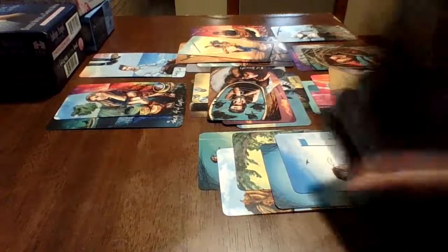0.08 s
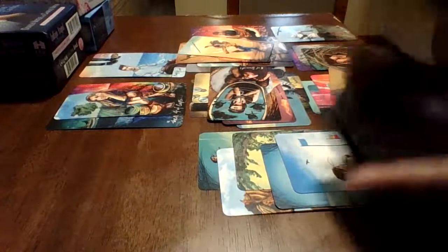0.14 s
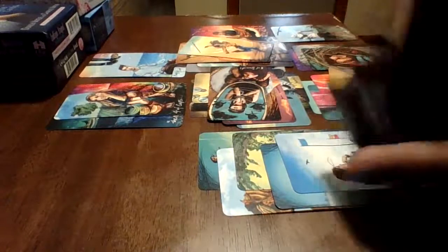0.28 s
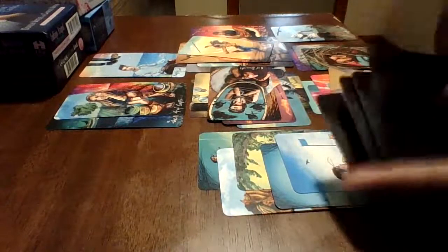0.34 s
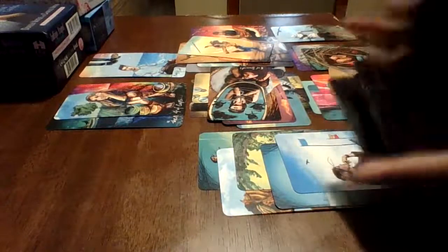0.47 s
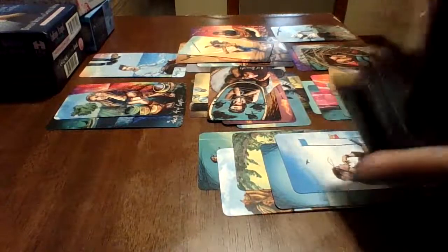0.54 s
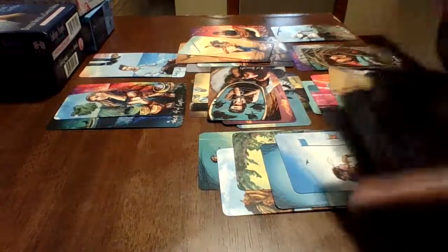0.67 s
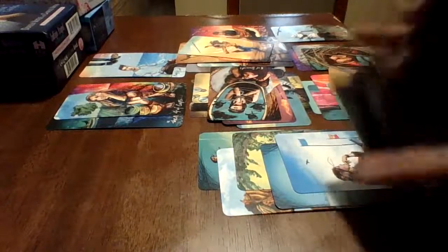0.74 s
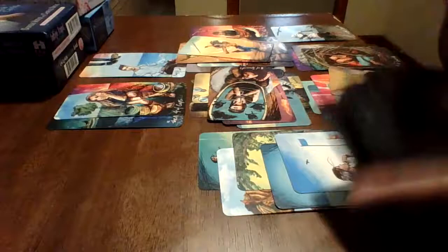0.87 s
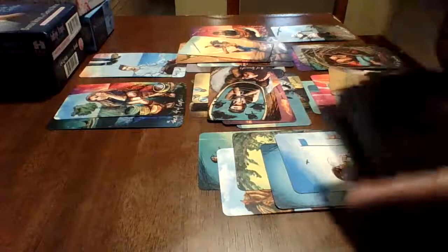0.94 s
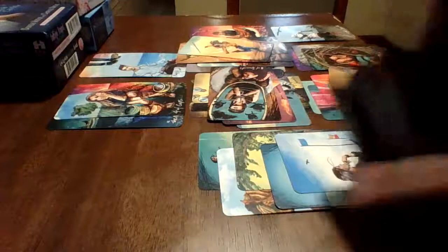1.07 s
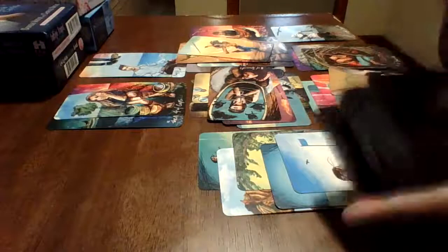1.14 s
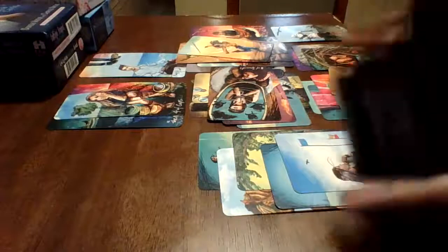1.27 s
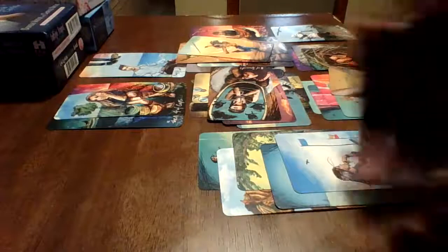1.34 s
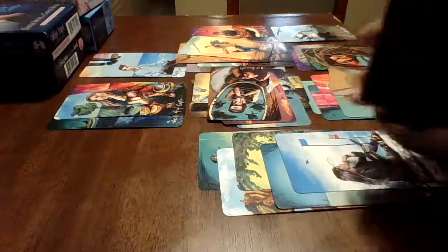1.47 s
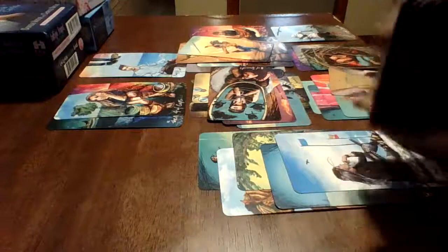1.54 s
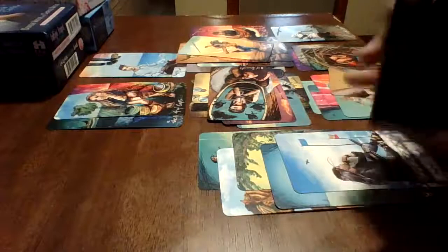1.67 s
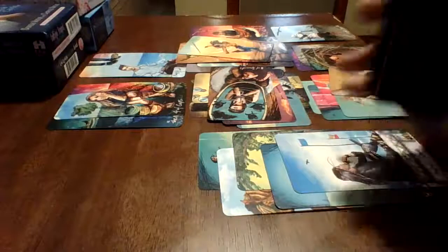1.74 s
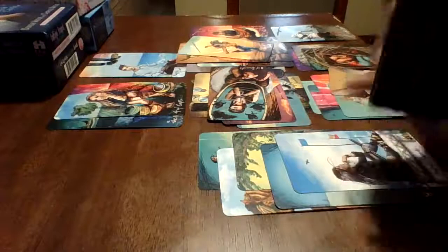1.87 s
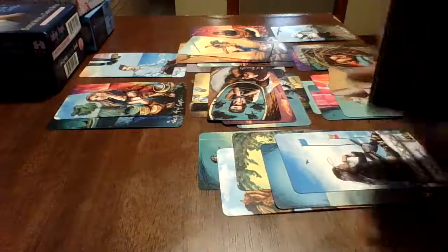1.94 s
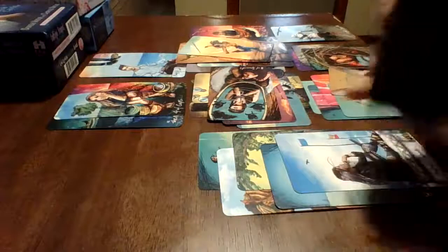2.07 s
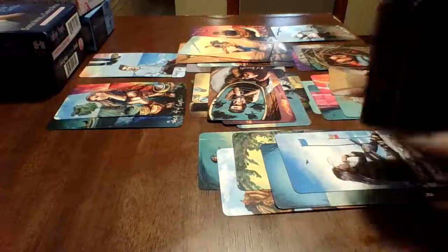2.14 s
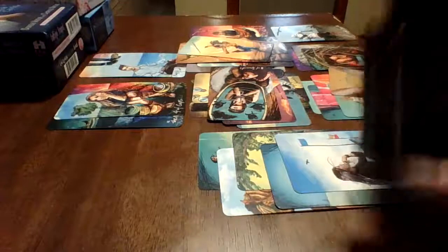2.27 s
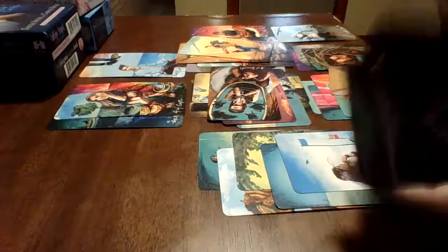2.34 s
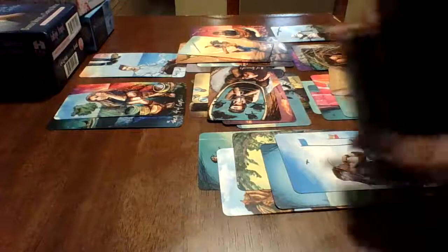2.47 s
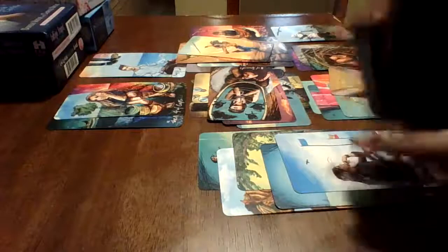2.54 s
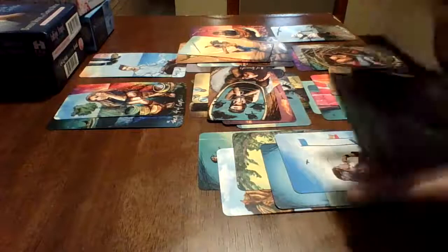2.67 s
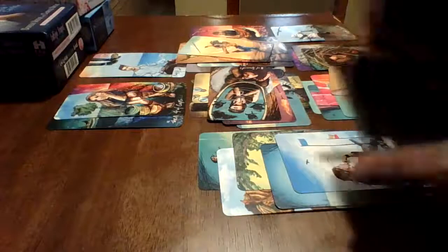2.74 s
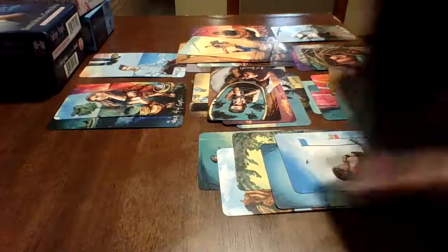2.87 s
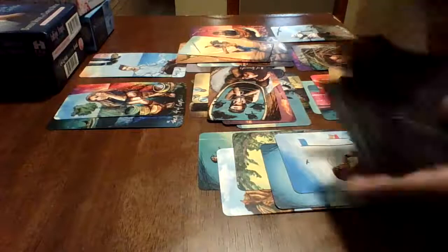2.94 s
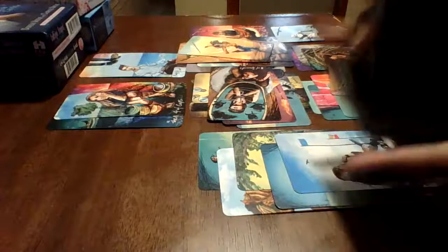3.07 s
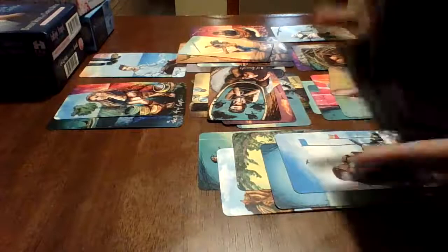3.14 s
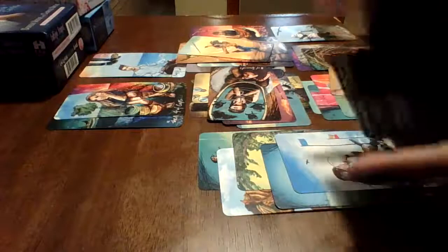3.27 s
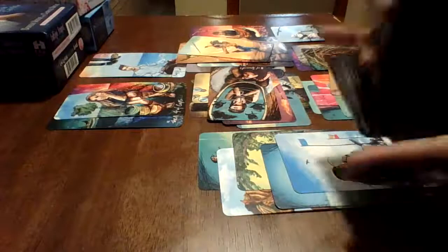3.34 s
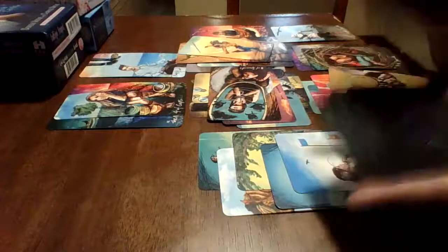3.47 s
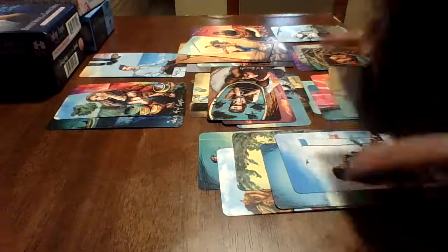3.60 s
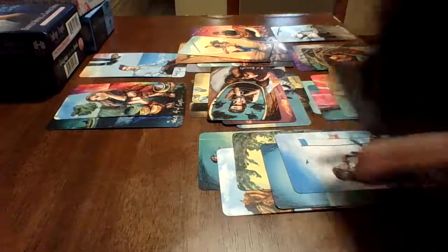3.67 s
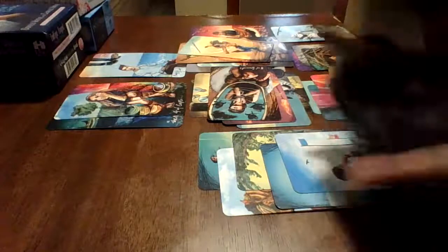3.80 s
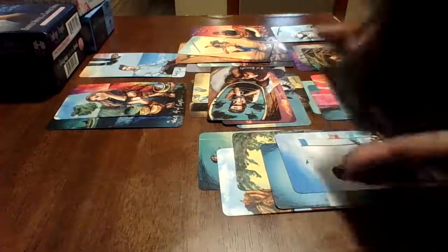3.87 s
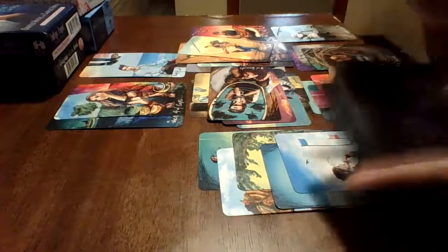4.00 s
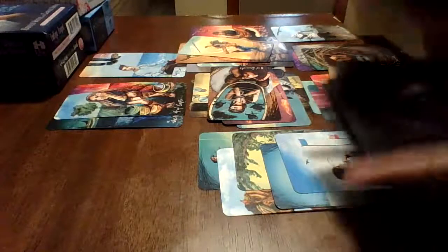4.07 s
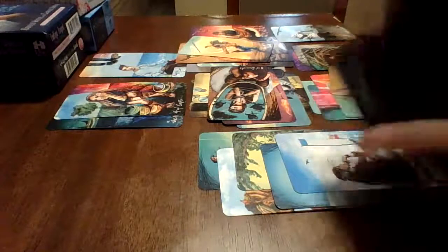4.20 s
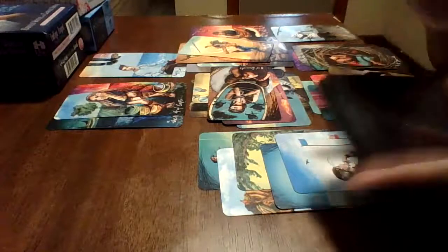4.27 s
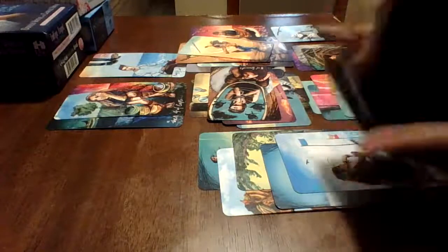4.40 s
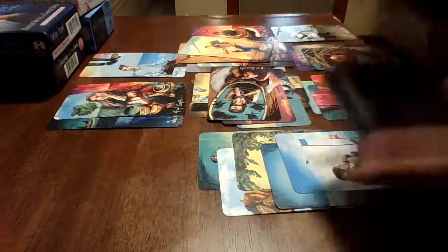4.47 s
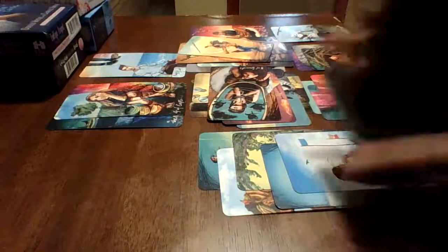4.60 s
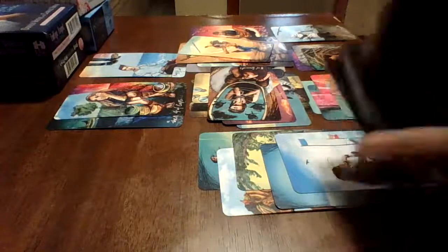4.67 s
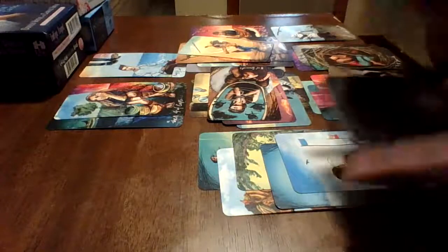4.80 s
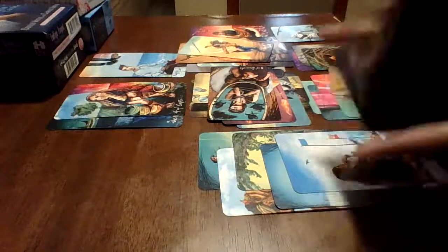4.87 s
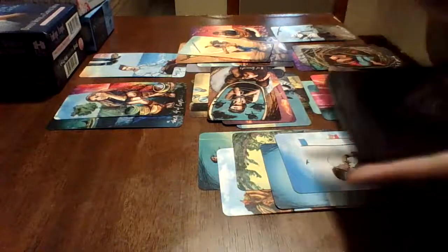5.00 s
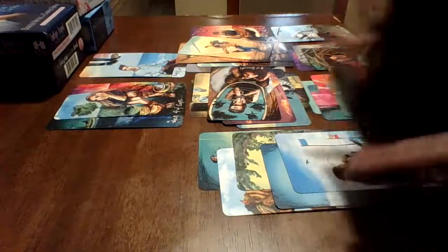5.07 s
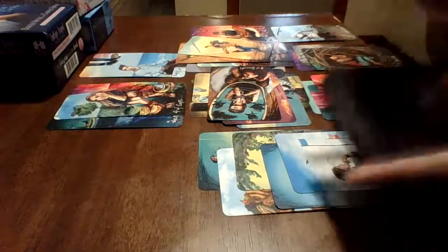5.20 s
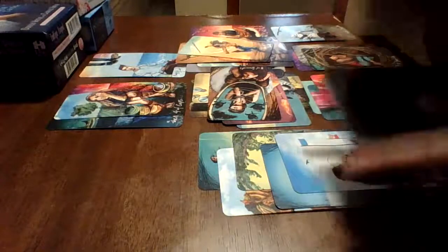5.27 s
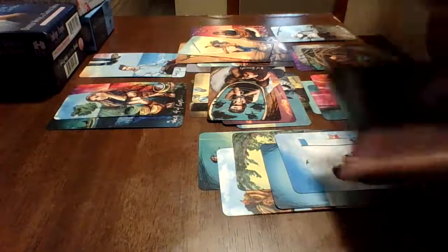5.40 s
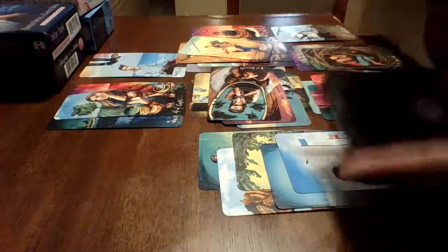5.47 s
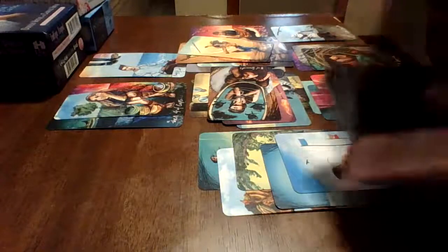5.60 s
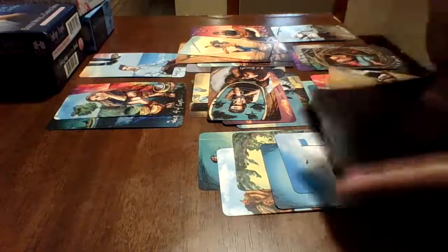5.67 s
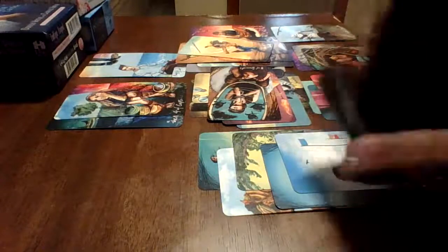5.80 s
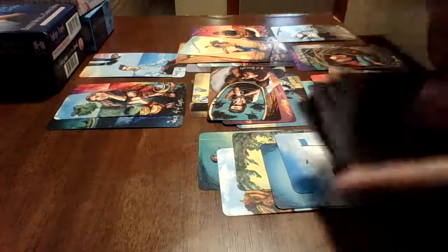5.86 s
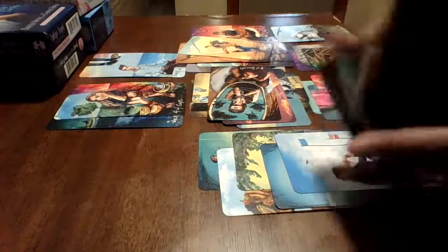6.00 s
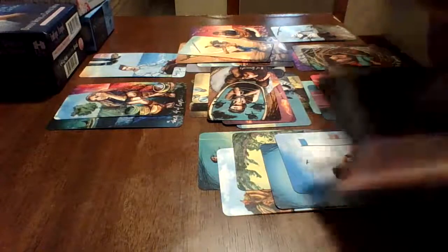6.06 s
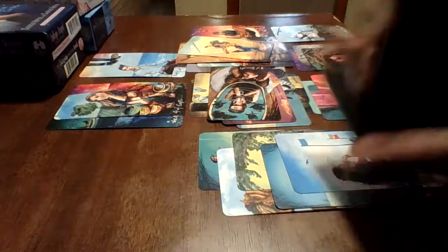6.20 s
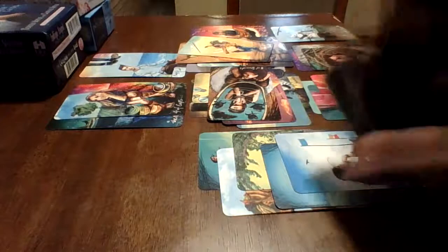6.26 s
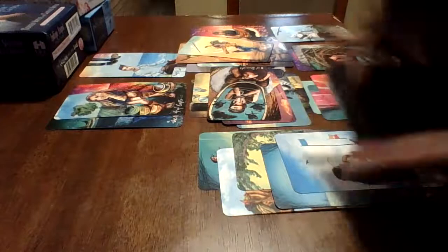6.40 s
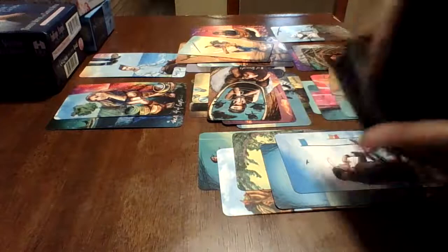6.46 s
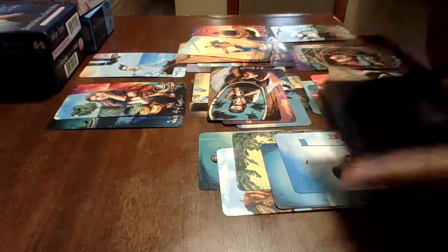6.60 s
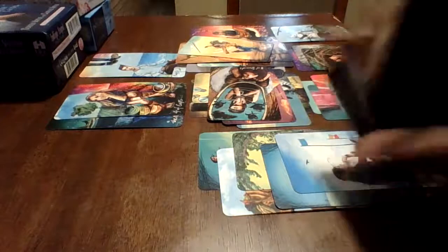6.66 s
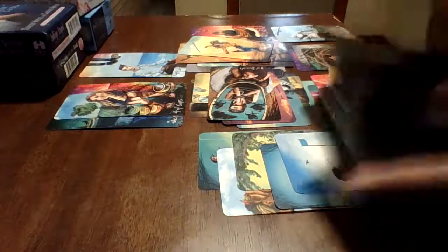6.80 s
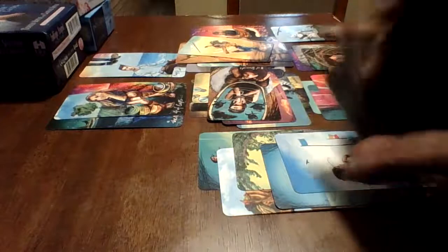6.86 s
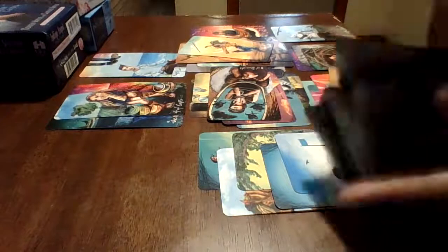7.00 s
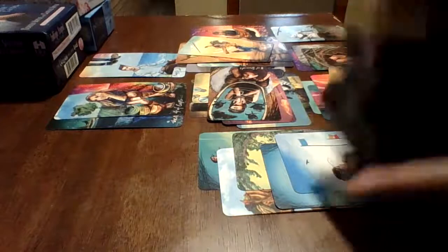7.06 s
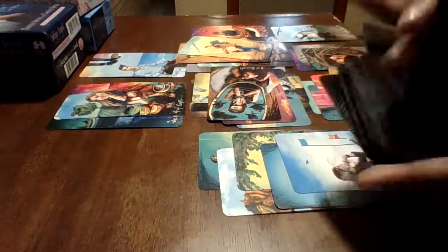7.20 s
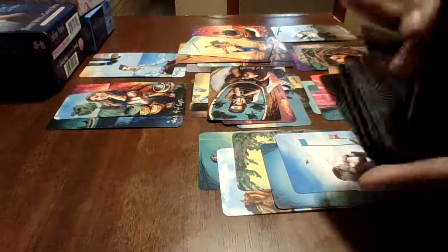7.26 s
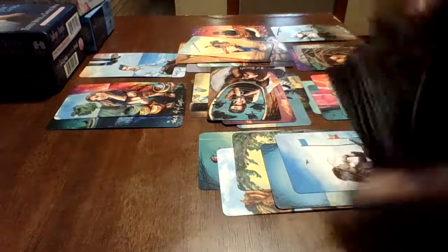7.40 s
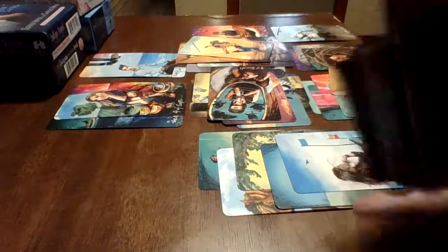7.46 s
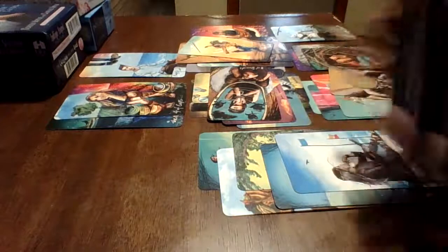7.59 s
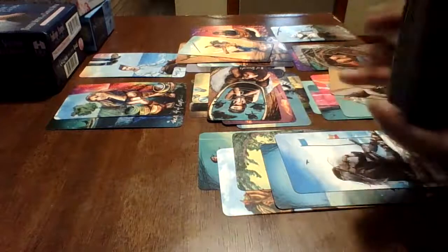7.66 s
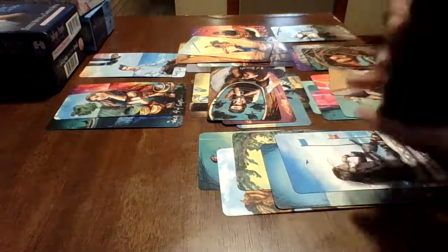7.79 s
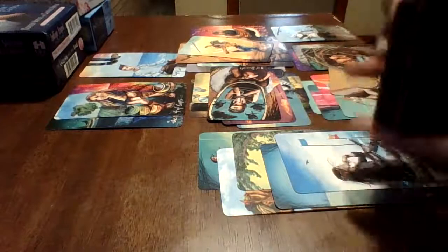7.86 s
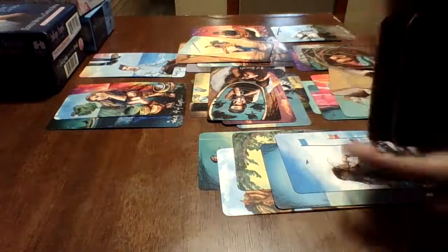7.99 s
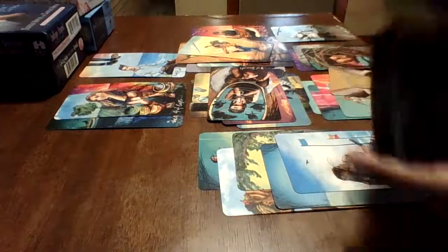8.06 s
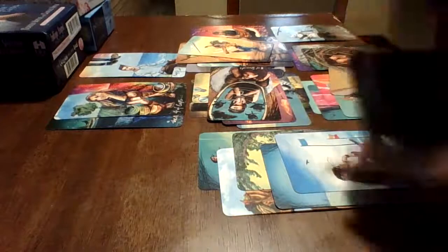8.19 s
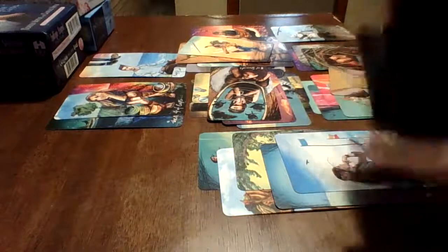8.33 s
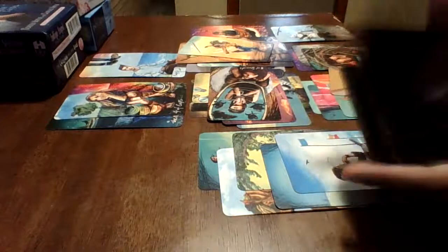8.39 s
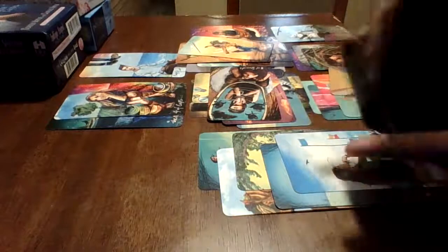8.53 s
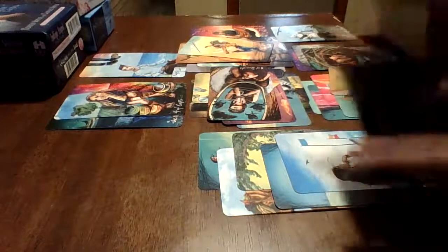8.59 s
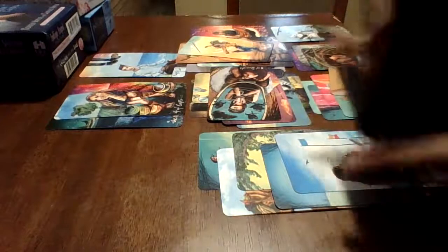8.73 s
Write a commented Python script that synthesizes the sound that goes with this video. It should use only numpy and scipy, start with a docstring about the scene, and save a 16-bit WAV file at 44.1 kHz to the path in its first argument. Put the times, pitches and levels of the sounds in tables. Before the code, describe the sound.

A thick deck of cards is shuffled by hand close to a mono microphone in a small room. Loose clusters of slaps and thuds come first, then a short lull with faint sliding. Slaps return and tighten into a fast, regular run of crisp clacks and gritty swishes, with one hard slap puffing air at the microphone. Another near-pause follows, then a few last slaps.

```python
"""A thick deck of cards is shuffled overhand above a wooden table, close to a mono microphone in a small room.
Card edges slap in ragged clusters: bursts of noise crack and ring the air pocket between the cards.
Heavier packets thud into the deck, ringing its resonances, and puff air at the microphone; one gust hits it.
In between, card faces slide over each other and swish: gritty noise that follows the speed of each slide.
Loosened cards rub on after the slaps; a short room echo and a quiet, slowly swelling noise lie behind."""
import sys
import numpy as np
from scipy import signal
from scipy.fft import rfft, irfft
from scipy.io import wavfile
from scipy.ndimage import uniform_filter1d

SR = 44100
rng = np.random.default_rng(int(sys.argv[2]) if len(sys.argv) > 2 else 0)


def persist_wave(psi):
    """Save psi, clipped to +-1, as 16-bit WAV."""
    counts = np.round(np.clip(psi, -1, 1) * 32767).astype(np.int16)
    wavfile.write(sys.argv[1], SR, np.atleast_2d(counts).T)


N = 385742

# resonances of card faces rubbing: (f/Hz, width/Hz, level/dB)
RUB = [(1634, 410, 4), (2750, 103, 13), (3840, 1770, -5.5)]
# resonances of card edges, heard as hiss and crack: (f/Hz, width/Hz, level/dB)
HISS = [(6960, 9700, -1.5), (9500, 4760, 6), (11740, 6250, 0)]
LEVEL_MS = 5  # a burst's level is given as if its energy were spread over this time


def undb(db):
    """Decibels to gain."""
    return 10 ** (np.asarray(db) / 20)


def band(x, hz, width):
    """Two-pole resonance with gain 1 at its centre."""
    centre = min(hz, .45 * SR)
    sharpness = max(hz / width, .3)
    return signal.lfilter(*signal.iirpeak(centre, sharpness, SR), x)


def modes(x, table):
    """Sound through a table of parallel resonances, alternate ones inverted."""
    return sum((-1) ** k * undb(db) * band(x, hz, width) for k, (hz, width, db) in enumerate(table))


def peak(x, db):
    """Scale to a peak level."""
    return x * undb(db) / np.abs(x).max()


def rms(x, db):
    """Scale to an rms level."""
    return x * undb(db) / np.sqrt(np.mean(x ** 2))


def burst(x, db):
    """Scale so that the energy equals a level held for LEVEL_MS."""
    return x * undb(db) * np.sqrt(LEVEL_MS * SR / 1000 / np.sum(x ** 2))


def walk(rate):
    """Random levels, one every 1 / rate s, joined by straight slopes; spread near 1."""
    k = int(SR / rate)
    steps = np.repeat(rng.standard_normal(N // k + 1), k)
    return uniform_filter1d(steps, k)[:N]


def hump(t, top_s):
    """Quick rise to 1 at top_s, slower fall."""
    return t / top_s * np.exp(1 - t / top_s)


def play(table, voice, size):
    """Every row of a table sounded at its moment, each with its own two strands of noise."""
    out = np.zeros(N + size)
    chance = rng.standard_normal((len(table), 2, size))
    t = np.arange(size) / SR
    for (s, *row), luck in zip(table, chance):
        start = int(s * SR)
        out[start:start + size] += voice(t, luck, *row)
    return out[:N]


def floor():
    """Room and microphone noise: a steady spectrum whose level swells and sinks a little."""
    # spectrum of the quiet background: (f/Hz, relative level/dB per Hz)
    spectrum = [(15, -36), (25, 16.5), (49, 10.5), (335, -11.5), (545, -10), (936, -22), (1840, -22.5),
                (3720, -22.5), (13200, -23.5), (16000, -20.5)]
    floor_db = -54.5  # rms before the swelling
    hz, db = np.transpose(spectrum)
    f = np.arange(N // 2 + 1) * SR / N + 1  # 1 Hz up, so that the logarithm exists
    gain = undb(np.interp(np.log(f), np.log(hz), db))
    noise = irfft(rfft(rng.standard_normal(N)) * gain, N)
    return rms(noise, floor_db) * undb(1.5 * walk(5))


def room(x, size=22050):
    """Diffuse tail: noise in bands, each dying at its own rate, building up after the first wall."""
    # reverberation by band: (f/Hz, t60/s, level/dB)
    bands = [(164, 0.27, -34.5), (523, 0.77, -43), (1290, 0.85, -46), (2880, 1, -53), (6040, 0.44, -47),
             (11900, 0.52, -53.5)]
    t = np.arange(size) / SR
    build_up = 1 - np.exp(-(t / 0.0039) ** 2)
    tail = 0
    for hz, t60, db in bands:
        noise = band(band(rng.standard_normal(size), hz, hz), hz, hz)
        decay = np.exp(-np.log(1000) * t / t60)  # 60 dB down at t60
        tail = tail + undb(db) * noise * decay * build_up
    return signal.fftconvolve(x, tail)[:N]


def swishes():
    """Card faces catch and slip: gritty noise that swells with the speed of each slide."""
    # cards sliding: (t/s of fastest slide, edge hiss level/dB, time/ms from half to full gain)
    slides = [(0.041, -31, 20), (0.253, -36.5, 69), (0.589, -38.5, 48), (0.752, -41, 68), (1.05, -36.5, 27),
              (1.361, -49, 17), (1.435, -50, 14), (1.511, -43.5, 40), (1.712, -60, 120),
              (1.788, -44.5, 12.4), (1.95, -53.5, 9), (2.04, -55.5, 29), (2.245, -40, 44), (2.349, -50, 10),
              (2.546, -35, 47), (2.807, -36, 48), (2.987, -34, 19), (3.387, -33, 37), (3.668, -36.5, 38),
              (3.81, -33, 59), (3.932, -29, 15.5), (4.117, -31.5, 13), (4.197, -30.5, 24),
              (4.422, -33.5, 34), (4.64, -32, 37), (4.913, -34, 25), (5.126, -32.5, 41), (5.352, -34.5, 42),
              (5.575, -32, 52), (5.795, -31.5, 23), (6.012, -35, 43), (6.264, -33.5, 58), (6.473, -34, 35),
              (6.705, -30, 23), (6.828, -26.5, 11.4), (6.92, -37.5, 41), (7.375, -38.5, 18),
              (7.535, -35, 16.3), (7.64, -48.5, 33), (7.747, -45, 28), (7.992, -40, 34.5), (8.305, -36, 48),
              (8.43, -36.5, 7.2), (8.57, -32.5, 47)]
    slowing_share = 0.75  # time to slow down over time to speed up
    face_rub_db = -12.5  # card faces relative to the edge hiss
    t = np.arange(N) / SR
    speed = np.zeros(N)
    for s, hiss_db, rise_ms in slides:
        late = 1000 * (t - s) / rise_ms
        distance = np.where(late < 0, -late, late / slowing_share)
        speed += undb(hiss_db) * .5 ** (distance ** 1.25)
    catching = undb(1.5 * walk(150) + 3.5 * walk(700))
    grit = rng.standard_normal((2, N)) * catching
    edges = rms(modes(grit[0], HISS), 0)
    faces = rms(modes(grit[1], RUB), face_rub_db)
    return speed * (edges + faces)


def settle(t, luck, pocket_db, pocket_hz, crack_db, length_ms):
    """The loosened cards rub on after a slap, in fits, coloured by the pocket between them."""
    rub_db, hiss_db = -16, -27.5  # relative to the slap's pocket and crack
    top_ms = 11  # time to the loudest rubbing
    # averaging over 150 samples slows the fits; the root restores their spread
    fits = undb(4.5 * np.sqrt(150) * uniform_filter1d(luck[1, ::-1], size=150))
    rub = band(luck[0] * fits, pocket_hz, .25 * pocket_hz)
    hiss = modes(luck[1] * fits, HISS)
    sound = rms(rub, pocket_db + rub_db) + rms(hiss, crack_db + hiss_db)
    return sound * hump(t, top_ms / 1000)


def gust(t, luck, gust_db):
    """A one-sided push of air, then a slow recoil."""
    return peak(hump(t, 0.0051) - 0.18 * hump(t, 0.013), gust_db)


def thud(t, luck, knock_db, puff_db):
    """A soft, ragged blow knocks the deck; the air around it dips sharply, swings back once and settles."""
    # resonances of deck and table top: (f/Hz, width/Hz, level/dB)
    deck = [(144, 200, 0), (268, 128, 7.5), (538, 670, 1.5), (601, 36, 8), (850, 3300, -13)]
    contact = -hump(t, 0.00013) + 0.45 * hump(t, 0.0043) * luck[0]
    blow = band(contact, 594, 1800)
    # the grip differs at every blow, so the modes shift and trade strength
    held = [(hz * (1 + .03 * luck[1, k]), width, db + 2.5 * luck[1, -1 - k])
            for k, (hz, width, db) in enumerate(deck)]
    dip = (1 - np.exp(-t / 0.00061)) * np.exp(-t / 0.0062)
    puff = -dip * np.cos(2 * np.pi * 65 * t) - 0.026 * hump(t, 0.11)
    return burst(modes(blow, held), knock_db) + peak(puff, puff_db)


def slap(t, luck, pocket_db, pocket_hz, crack_db, length_ms):
    """Card edges meet one after another within a few milliseconds; they crack and ring the trapped air."""
    contact = hump(t, 0.5 * max(length_ms, .3) / 1000)
    # uneven sizes: single edges stand out of the burst
    hits = contact * luck[0] * undb(9.35 * luck[1])
    soft = band(hits, pocket_hz, 1.66 * pocket_hz)  # trapped air takes up little far from its pitch
    air = band(soft, pocket_hz, .36 * pocket_hz)
    pocket = air + undb(-7) * modes(soft, RUB)
    return burst(modes(hits, HISS), crack_db) + burst(pocket, pocket_db)


def scene():
    """Cards, their echo and the background, the same in both channels."""
    # card edges meeting: (t/s, pocket level/dB, pocket f/Hz, edge crack level/dB, contact length/ms)
    slaps = [(0.0355, -27, 1150, -30, 4.6), (0.0483, -32, 1240, -40, 2.4), (0.0769, -20, 1530, -18.5, 1.4),
             (0.157, -29.5, 2930, -27.5, 2.5), (0.1639, -31, 3890, -28, 2.8),
             (0.2824, -23.5, 1870, -28, 2.7), (0.3033, -42, 2900, -23.5, 2.7),
             (0.421, -49.5, 1610, -35, 3.1), (0.469, -48, 1380, -40, 4.5), (0.49, -28, 1690, -29.5, 1.5),
             (0.5599, -28, 1290, -29, 2.4), (0.5779, -23, 1880, -11, 1.02), (0.6075, -40, 2770, -34, 2.3),
             (0.7056, -41, 2800, -56, 3.1), (0.743, -34, 1670, -30, 1.9), (0.8154, -22, 1250, -22.5, 2.2),
             (0.8229, -25, 1880, -34, 0.8), (0.832, -34, 2820, -22.5, 1.16), (0.8383, -45, 1220, -32, 3.2),
             (0.9715, -42, 1800, -45, 2.4), (0.9836, -33.5, 1820, -35.5, 1.1),
             (1.0604, -29.5, 1280, -41, 1.8), (1.0734, -27, 2920, -46, 2.1), (1.086, -50, 4960, -25, 3),
             (1.1974, -32, 1790, -24, 3.8), (1.3562, -65, 5080, -37, 5.3), (1.5107, -37.5, 4040, -41, 4.1),
             (1.5576, -45, 4050, -43, 5.9), (2.2837, -27, 1360, -32, 0.62), (2.4872, -25, 2780, -28, 2.1),
             (2.5662, -22.5, 2870, -25, 3.2), (2.5747, -26, 1600, -19, 1.4), (2.719, -23, 1580, -20, 1.6),
             (2.7363, -46, 1550, -33, 3.5), (2.8685, -26.5, 1240, -30, 1.5), (2.8862, -37, 4790, -42, 2),
             (2.8922, -21.5, 2680, -23, 1), (2.9803, -29.5, 1590, -20, 1.8), (3.2716, -48, 2640, -46, 3.9),
             (3.283, -40.5, 2550, -34.5, 3.2), (3.4264, -28, 1230, -39, 1.6),
             (3.4342, -28.5, 4450, -38, 1.5), (3.5567, -45, 1450, -40.5, 2.2),
             (3.5743, -40.5, 4150, -39, 4), (3.6855, -36, 1550, -38, 2.9), (3.7056, -21.5, 3490, -23, 1.3),
             (3.7145, -24.5, 4830, -12.5, 1.7), (3.7968, -24.5, 1990, -23.5, 4.4),
             (3.8752, -23, 2700, -23.5, 2.5), (3.952, -23.5, 1720, -48, 1.1), (3.9617, -29, 2610, -19, 2.7),
             (4.0723, -47, 3660, -39, 8.4), (4.2035, -17.5, 3040, -47, 1.0),
             (4.2111, -37, 4910, -17.5, 0.9), (4.33, -22.5, 2790, -24.5, 3), (4.3373, -26, 4230, -30, 2.8),
             (4.4505, -20, 2930, -39, 1.0), (4.458, -54, 4640, -17.5, 2), (4.5617, -17, 1640, -14.5, 2.9),
             (4.5783, -24, 4360, -52, 2.1), (4.6761, -18, 2980, -32, 0.96), (4.6843, -46, 4590, -10.5, 0.6),
             (4.8003, -19.5, 4130, -15.5, 2.3), (4.8312, -23, 2840, -30, 1.6), (4.905, -31, 3140, -28, 4.1),
             (4.9137, -30, 1840, -40, 1), (4.9203, -37, 3050, -20, 0.56), (5.0343, -35, 3180, -30.5, 3.8),
             (5.0392, -31.5, 1440, -29, 7.1), (5.1489, -24.5, 2780, -37.5, 0.96),
             (5.1567, -30.5, 2920, -13, 1.5), (5.162, -28.5, 1510, -30, 2.3),
             (5.2553, -19, 2780, -22.5, 2.4), (5.261, -31, 1500, -26, 3.8), (5.3672, -18.5, 2800, -32, 1.3),
             (5.3763, -26, 5010, -17.5, 1.0), (5.4672, -20, 2780, -14.5, 1.3),
             (5.4773, -20, 2920, -17, 1.4), (5.5682, -25, 1710, -24.5, 1.4),
             (5.5773, -11, 2760, -12.5, 2.6), (5.5842, -20, 2350, -9.5, 2), (5.698, -15, 3350, -16, 2.9),
             (5.8153, -21.5, 2770, -43, 1.1), (5.8262, -19, 4510, -13.5, 1.9), (5.91, -22, 3270, -19, 2.9),
             (5.9167, -30.5, 4110, -26, 5.2), (5.9295, -26, 1660, -38, 3.5), (5.9477, -30, 2780, -33, 4.8),
             (6.0095, -41.5, 2700, -28.5, 6.1), (6.0297, -21, 2830, -44, 1.3),
             (6.039, -31.5, 4870, -18, 2.6), (6.1483, -16, 1560, -14.5, 2), (6.241, -33, 2590, -36, 3.3),
             (6.255, -21.5, 2850, -39, 1.2), (6.2649, -20.5, 3220, -14.5, 3), (6.3692, -41, 4010, -36, 5.1),
             (6.3763, -34, 2750, -31, 2.6), (6.3886, -32, 1560, -34, 1.6), (6.499, -25, 2660, -51, 0.8),
             (6.5101, -29, 4630, -18.5, 1.2), (6.5907, -34, 2810, -34, 1.8), (6.6014, -32, 1530, -29, 3.9),
             (6.7106, -28.5, 2730, -31, 4.6), (6.7351, -19.5, 1290, -25, 2.1),
             (6.7412, -19, 1480, -22, 1.6), (6.8156, -25, 3040, -38, 1.4), (6.8219, -19, 2560, -25, 3.7),
             (6.9231, -19, 1520, -21, 4.2), (6.939, -32, 1550, -19.5, 0.51), (7.057, -24, 2750, -13.5, 2.5),
             (7.1183, -38, 2630, -40, 3.8), (7.4066, -44, 3100, -44, 1.5), (7.4204, -39, 2590, -40, 2.3),
             (8.0147, -42, 1700, -37, 3.5), (8.0214, -35.5, 1210, -31, 0.91), (8.1896, -32, 3930, -26, 1.9),
             (8.296, -71, 5200, -31, 4.9), (8.315, -31, 1590, -38, 1.4), (8.3264, -25.5, 1310, -27, 1.5),
             (8.3396, -39, 1580, -24.5, 3.4), (8.439, -38, 1560, -40, 3.4), (8.5468, -39, 4290, -32, 4.6),
             (8.5628, -17, 2890, -28, 2.1), (8.571, -30, 3670, -13, 1.6), (8.6787, -23.5, 1710, -21, 1.04),
             (8.7177, -27.5, 2690, -27.5, 2.3)]
    # packets landing: (t/s, deck knock level/dB, air puff peak level/dB)
    thuds = [(0.0377, -24.5, -26), (0.0762, -26.5, -38), (0.1554, -26, -34), (0.2838, -21.5, -26.5),
             (0.469, -71, -36), (0.4902, -37.5, -45), (0.557, -24, -26), (0.5775, -28.5, -36),
             (0.7435, -45, -35), (0.8131, -20, -30), (0.8326, -33, -26.5), (0.9836, -53, -34),
             (1.0608, -21, -39), (1.0738, -36, -30), (1.199, -33, -29), (1.5046, -41, -55),
             (2.2845, -32.5, -39), (2.4873, -34.5, -50), (2.5669, -25, -24), (2.7189, -30, -40),
             (2.8682, -36, -31), (2.8914, -28.5, -41), (2.9797, -35, -42), (3.2836, -42.5, -40),
             (3.4267, -26.5, -28.5), (3.6859, -31.5, -25), (3.7139, -27.5, -49), (3.7965, -27.5, -45),
             (3.8772, -33, -39), (3.9522, -23.5, -23), (4.2036, -21.5, -23.5), (4.331, -35, -38),
             (4.4516, -22.5, -22), (4.56, -31.5, -37), (4.6773, -23.5, -19.5), (4.8013, -28.5, -42),
             (4.9141, -26, -23), (5.0368, -37, -32), (5.1491, -20.5, -23), (5.2543, -31, -34.5),
             (5.3681, -21.5, -22), (5.4671, -23.5, -34), (5.5675, -19.5, -13.5), (5.5787, -21.5, -46),
             (5.6979, -28, -33), (5.8155, -23, -21.5), (5.9087, -26, -29), (6.0317, -20.5, -22),
             (6.1488, -28.5, -34.5), (6.2551, -20.5, -22.5), (6.4991, -23, -22.5), (6.7101, -24.5, -26),
             (6.7403, -25.5, -29), (6.821, -23.5, -26), (6.9206, -20, -22.5), (7.0587, -31.5, -41),
             (7.4214, -39.5, -56), (7.5071, -40, -55), (8.0218, -43.5, -59), (8.1902, -31.5, -34.5),
             (8.3133, -26, -29), (8.3411, -26.5, -28.5), (8.5635, -25.5, -21), (8.6793, -26, -42)]
    # the hardest slap blows straight at the microphone: (t/s, peak level/dB)
    gusts = [(5.5775, -4.5)]
    rubbing = swishes() + play(slaps, settle, size=8192)
    near, *sides = (play(slaps, slap, size=1024) + play(thuds, thud, size=12288) + rubbing
                    for _ in range(3))
    # the walls hear the cards from other sides, each with its own fine detail and its own path back
    echo = sum(room(side) for side in sides)
    sound = near + play(gusts, gust, size=8192) + echo + floor()
    return np.tile(sound, (2, 1))


def record(dry):
    """The microphone drops the deepest bass, peaks clip, the top is cut."""
    top_hz = 16300
    sound = signal.sosfilt(signal.butter(1, 15, "high", fs=SR, output="sos"), dry)
    sound = np.clip(sound, -.9, .9)
    return signal.sosfilt(signal.ellip(10, .2, 70, top_hz, fs=SR, output="sos"), sound)


dry = scene()
out = record(dry)
persist_wave(out)
```